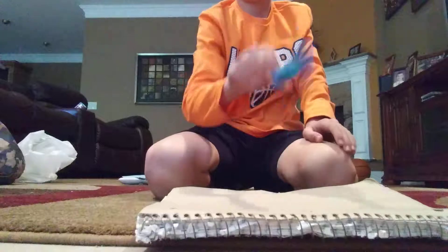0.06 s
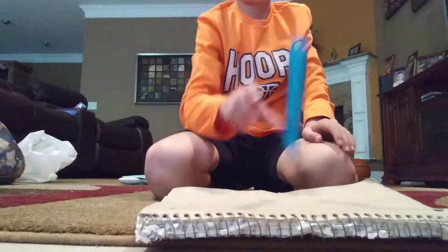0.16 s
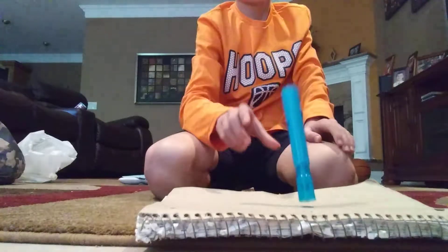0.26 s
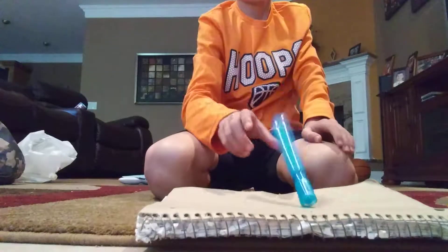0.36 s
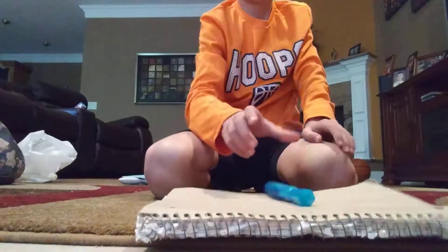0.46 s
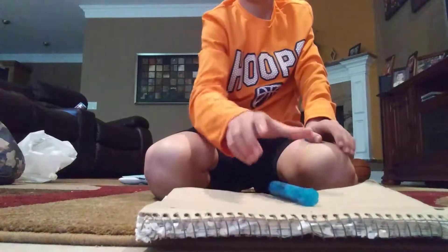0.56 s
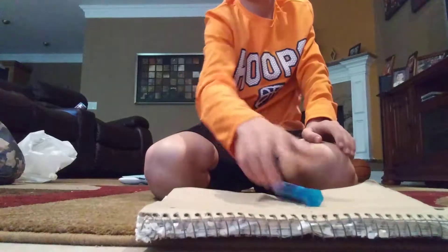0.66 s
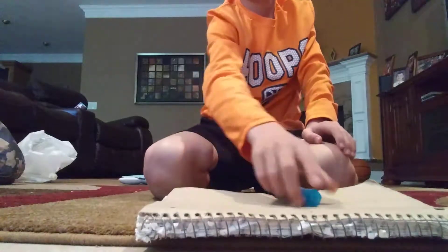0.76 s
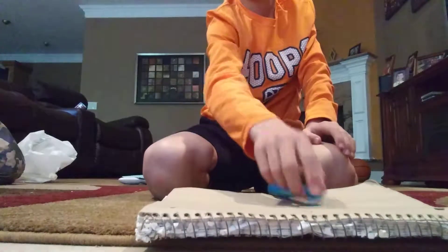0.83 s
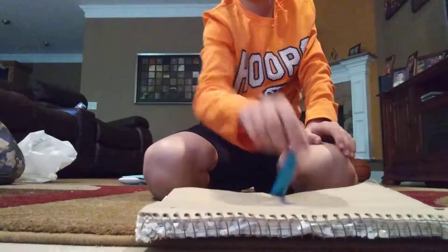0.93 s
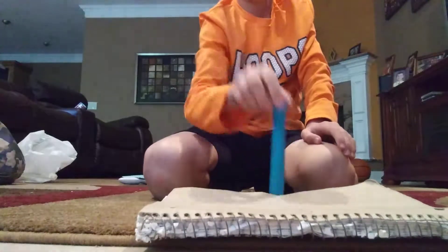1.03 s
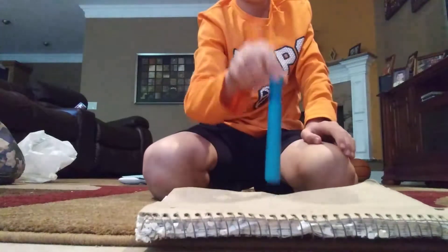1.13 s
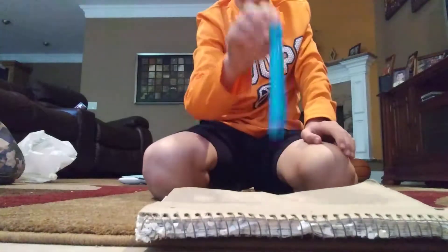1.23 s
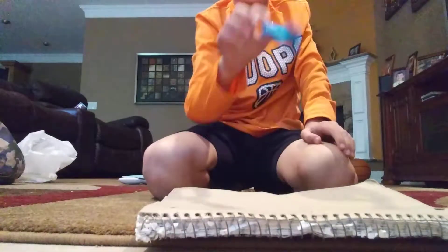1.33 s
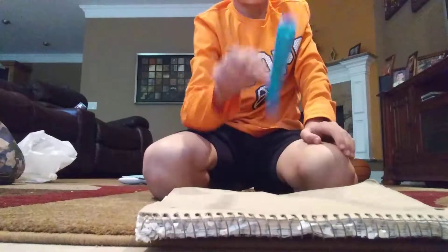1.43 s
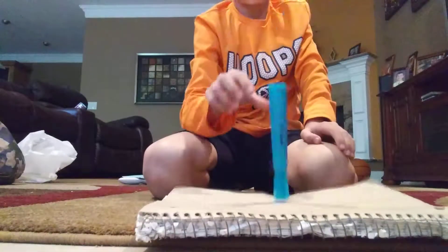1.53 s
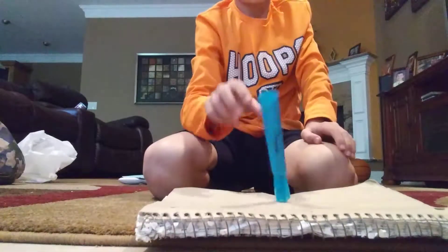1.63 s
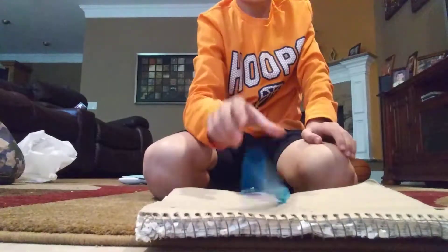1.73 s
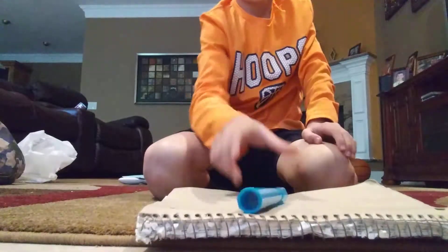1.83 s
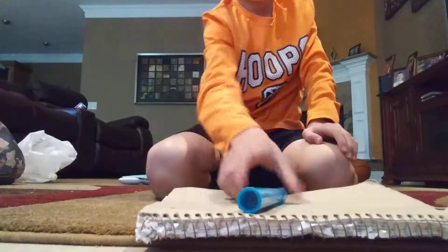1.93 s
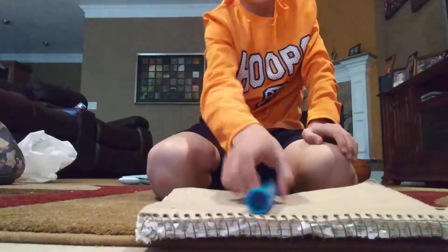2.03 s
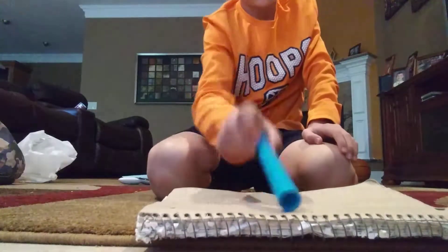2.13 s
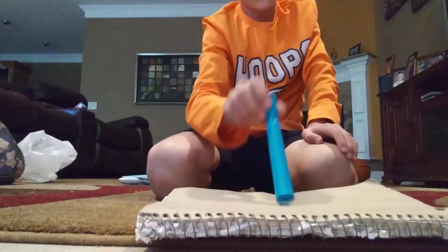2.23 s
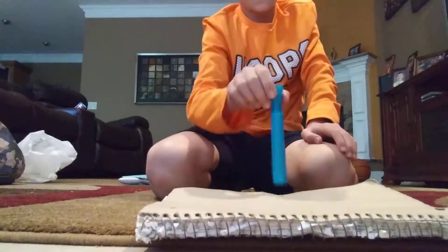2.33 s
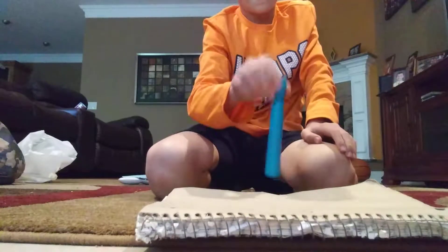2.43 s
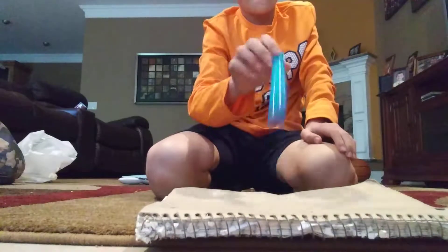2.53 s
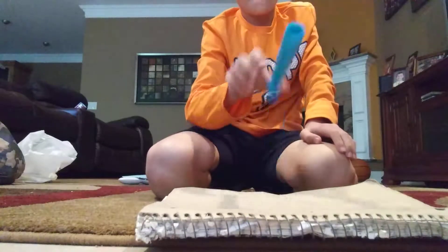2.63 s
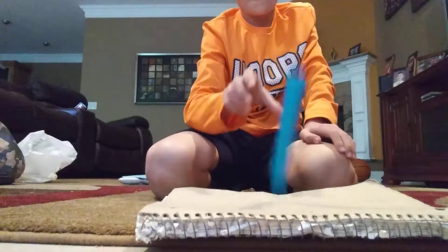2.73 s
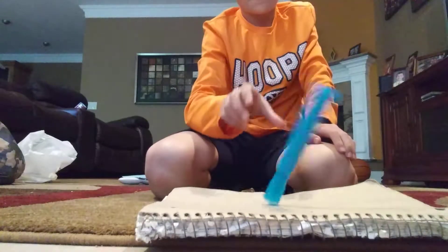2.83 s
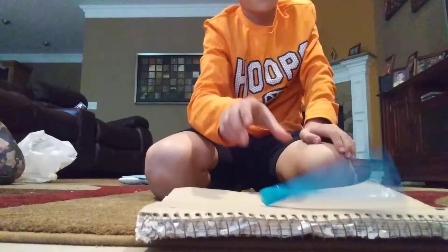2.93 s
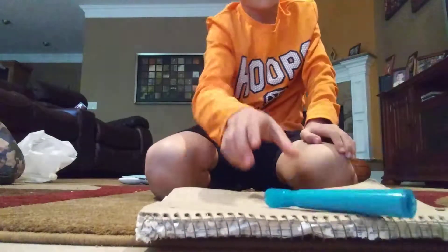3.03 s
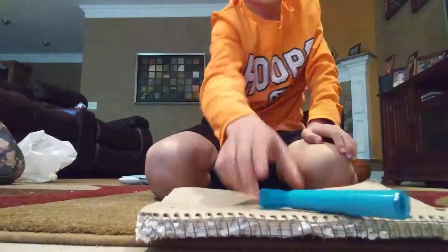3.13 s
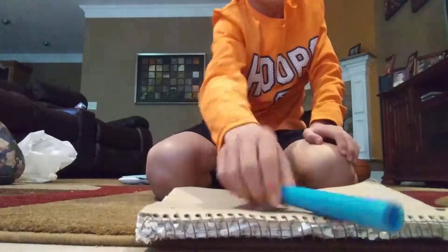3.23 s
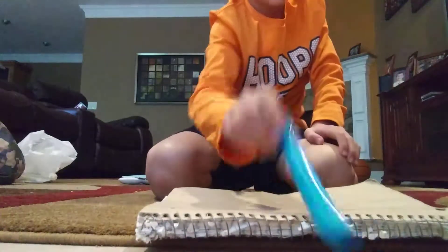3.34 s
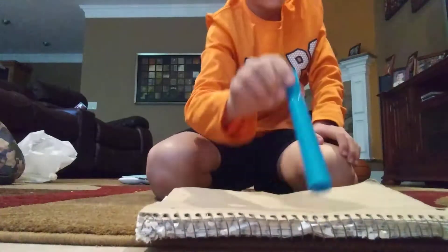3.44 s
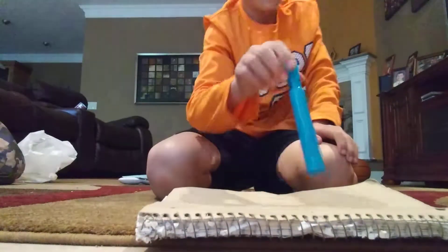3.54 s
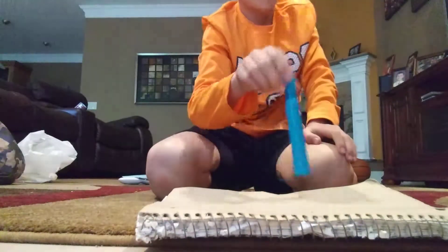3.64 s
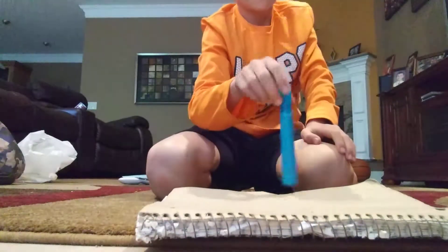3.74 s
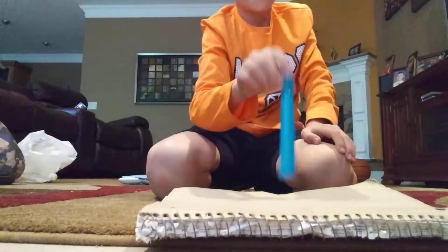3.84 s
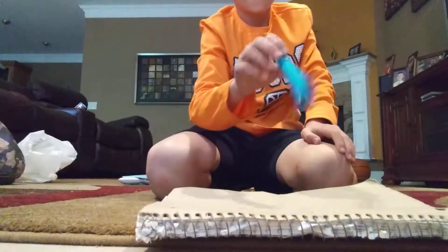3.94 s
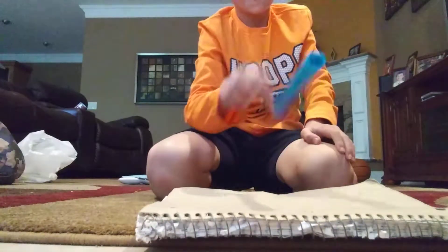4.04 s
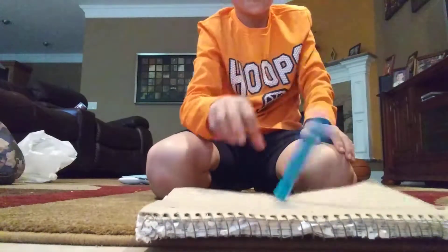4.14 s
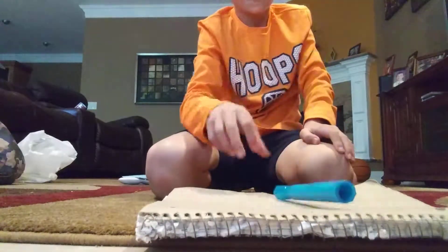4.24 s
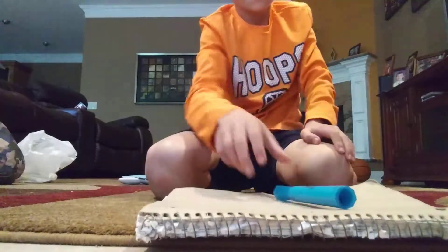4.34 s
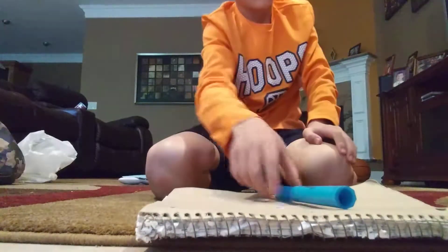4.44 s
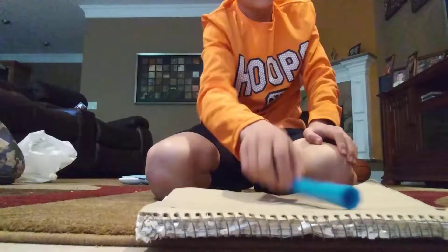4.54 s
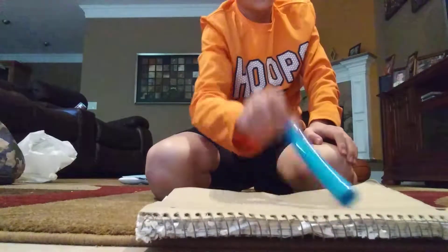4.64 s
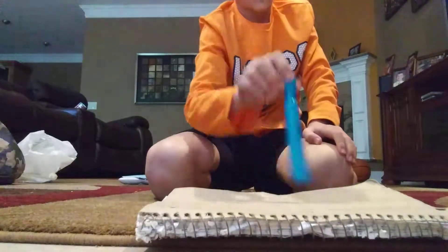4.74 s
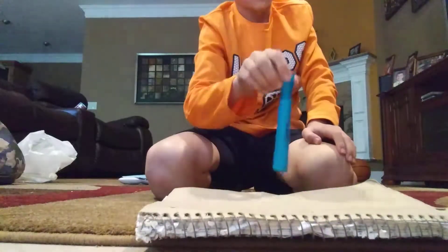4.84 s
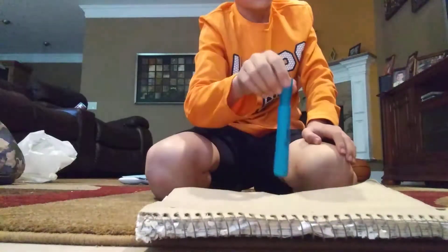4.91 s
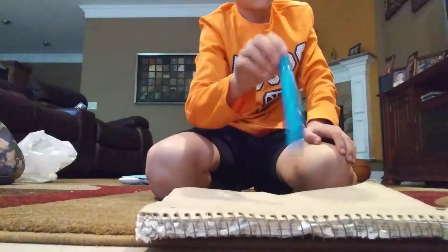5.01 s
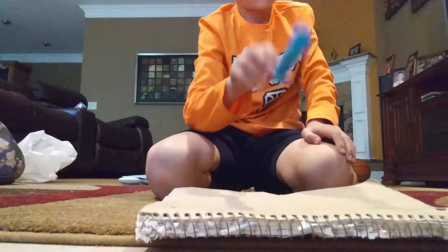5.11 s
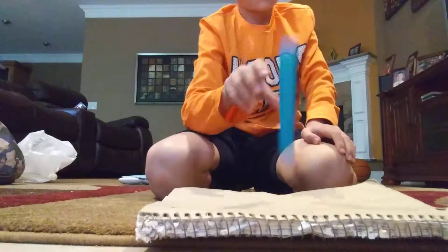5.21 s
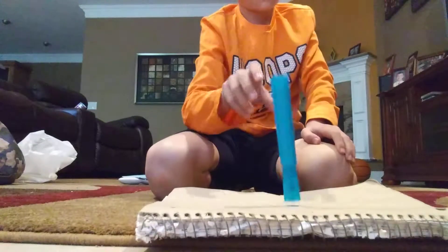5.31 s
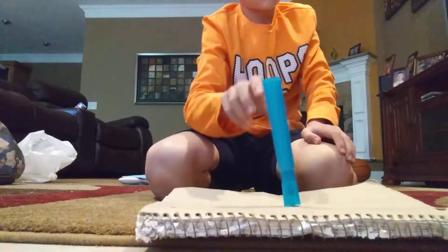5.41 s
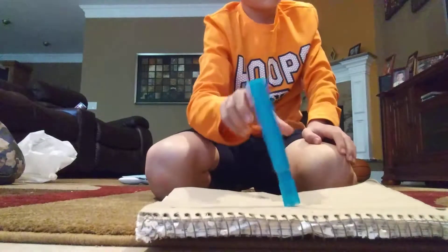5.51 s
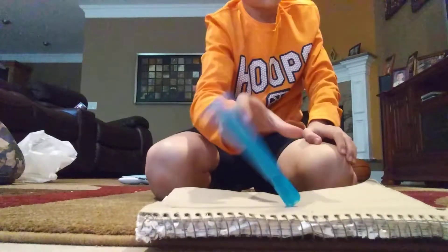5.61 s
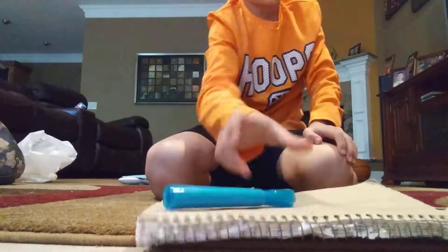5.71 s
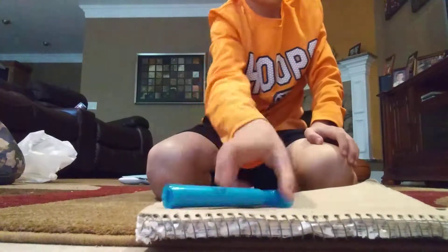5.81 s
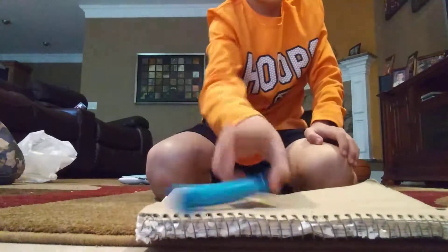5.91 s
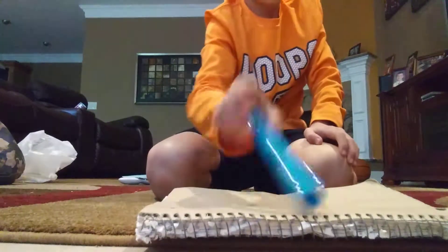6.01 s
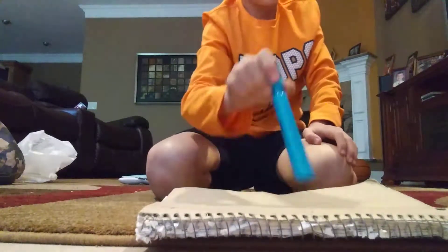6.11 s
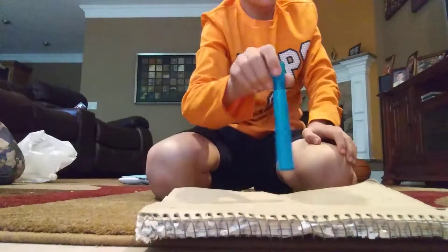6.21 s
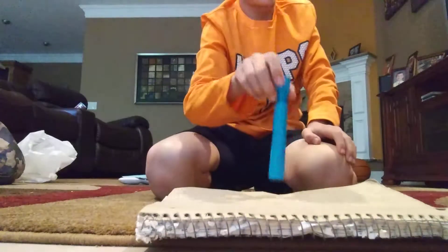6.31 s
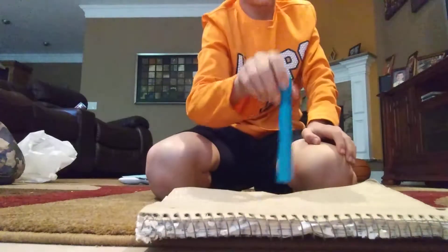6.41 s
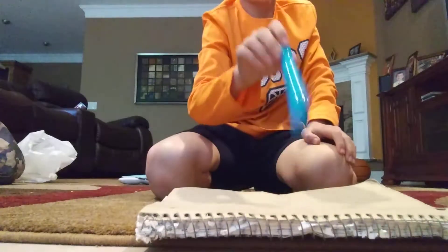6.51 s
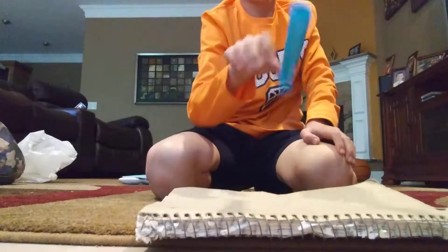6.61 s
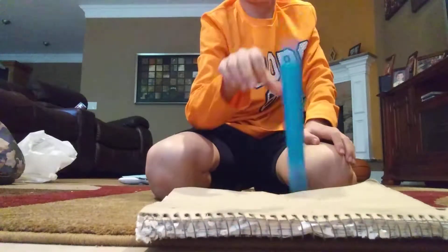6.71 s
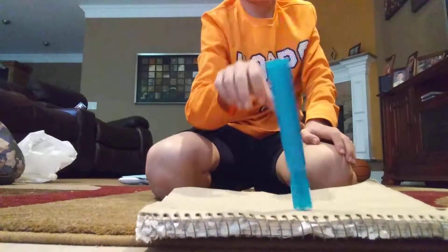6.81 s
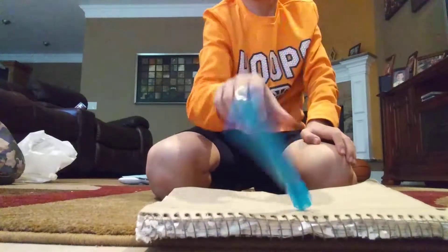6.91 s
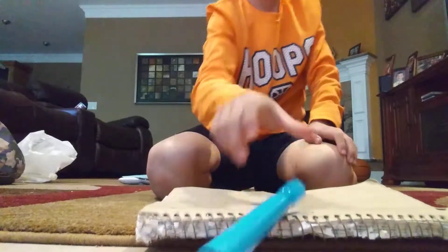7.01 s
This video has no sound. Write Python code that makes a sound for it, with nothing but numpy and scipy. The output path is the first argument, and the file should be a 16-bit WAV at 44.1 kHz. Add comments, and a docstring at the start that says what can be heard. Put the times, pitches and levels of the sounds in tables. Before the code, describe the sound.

In a quiet living room, a plastic highlighter is flipped onto a spiral notebook six times. It lands on its end with a thump and a clack, hops, and topples flat. Between throws a hand scrapes it off the cover, the loose cap rattling. The last throw glances off the wire binding with a sharp, bright crack. A nearby phone microphone picks up short room echoes and a very faint hum.

```python
"""Over a low ventilation hum, a plastic highlighter is flipped onto a spiral notebook on a living-room
floor. It lands on its end, thumping the pad and slapping the cover, hops, and topples flat as the room
rings on. A hand comes down and scrapes it up, its loose cap rattling. Five more throws follow; the last
glances off the binding and clips the wire. All the while, the noise suppressor of a phone close by
turns each frequency down as it fades."""
import sys
import numpy as np
from scipy import signal
from scipy.fft import rfft, irfft, next_fast_len
from scipy.io import wavfile
from scipy.ndimage import uniform_filter1d, minimum_filter1d

SR = 44100
rng = np.random.default_rng(int(sys.argv[2]) if len(sys.argv) > 2 else 0)


def int16_out(signal):
    """Quantize to a 16-bit WAV file."""
    q = np.round(np.clip(np.atleast_2d(signal).T, -1, 1) * 32767)
    wavfile.write(sys.argv[1], SR, q.astype(np.int16))


N = 311346


def amp(db):
    """Decibels as a linear gain."""
    return 10 ** (np.asarray(db) / 20)


def unit(x):
    """x at rms 1."""
    return x / np.sqrt(np.mean(x ** 2) + 1e-20)


def along(points, hz):
    """Read a curve of (f/Hz, value) points on a log frequency axis."""
    f, values = np.transpose(points)
    return np.interp(np.log(hz + 1), np.log(f + 1), values)


def add(track, s, sound):
    """Mix a sound into the track from time s."""
    part = track[max(round(s * SR), 0):][:len(sound)]
    part += sound[:len(part)]


def filtered(x, response):
    """x through an EQ given as a function of frequency."""
    size = next_fast_len(len(x) + SR)
    return irfft(rfft(x, size) * response(np.fft.rfftfreq(size, 1 / SR)), size)[:len(x)]


def coloured(x, spectrum):
    """x with a (f/Hz, level/dB) colour, at rms 1."""
    return unit(filtered(x, lambda hz: amp(along(spectrum, hz))))


def sharpest_pulse(gain):
    """The minimum-phase pulse that has this magnitude spectrum."""
    cepstrum = irfft(np.log(np.maximum(gain, 1e-6)))
    half = len(cepstrum) // 2
    cepstrum[1:half] *= 2
    cepstrum[half + 1:] = 0
    return irfft(np.exp(rfft(cepstrum)))


HUM_COLOUR = [(20, -40.5), (45, -13.5), (75, -13), (103, -1), (125, -2.5), (150, -19), (240, -28),
              (285, -29), (320, -7), (360, -23.5), (600, -34.5), (2000, -71.5)]  # tone of the ventilation: f/Hz, level/dB
HUM_FADER = [(0, -66), (0.921, -65.5), (1.22, -71.5), (1.36, -63.5), (2.699, -65.5), (3.3, -62), (3.7, -68),
             (4.4, -58.5), (4.949, -66), (6.37, -62), (6.7, -69)]  # its slow swell: t/s, level/dB


def ventilation():
    """The bed: a low, wavering ventilation hum."""
    level_db = np.interp(np.arange(N) / SR, *np.transpose(HUM_FADER))
    return amp(level_db) * coloured(rng.standard_normal(N), HUM_COLOUR)


# faint rustles between the hits: t/s, centre f/Hz, width/Hz, level/dB, t60/s
RUSTLES = [(3.5, 1343, 260, -60.5, 0.21), (4.124, 810, 1300, -57, 0.24), (4.124, 2110, 1300, -62, 0.5),
           (5.641, 1300, 600, -56, 0.43), (5.653, 2190, 650, -52, 0.24), (5.643, 5840, 443.5, -68, 0.92)]


def rustles(attack_s=0.0015):
    """Small puffs of band-passed noise that swell quickly and fade."""
    track, t = np.zeros(N), np.arange(SR // 4) / SR
    for s, centre_hz, width_hz, db, t60 in RUSTLES:
        noise = rng.standard_normal(len(t))
        band = unit(filtered(noise, lambda hz: 1 / (1 + (2 * (hz - centre_hz) / width_hz) ** 2) ** 2))
        add(track, s, band * amp(db - 60 * t / t60) * (1 - np.exp(-t / attack_s)))
    return track


# the room's ringing notes: f/Hz, width/Hz, level/dB
ROOM_MODES = [(103.4, 4.9, -6.5), (117.2, 1.9, -4), (180.5, 6, -4), (326, 7.9, -1.5), (436, 8.2, -1),
              (613, 6, -8.5), (1450, 3, -8), (1520, 2.6, -10.5)]


def standing_waves(x):
    """The room's modes boom on after each hit."""
    def response(hz):
        return sum(amp(db) * 1j * hz * width / (centre ** 2 - hz ** 2 + 1j * hz * width)
                   for centre, width, db in ROOM_MODES)
    return filtered(x, response)


REVERB_COLOUR = [(60, -9.5), (180, -6.5), (500, -8.5), (900, -14), (1250, -9), (1480, -8), (1750, -7.5),
                 (2200, -8.5), (3100, -11.5), (4200, -15.5), (5500, -10), (8000, -5.5), (12000, -9.5)]  # tone of the tail off the walls: f/Hz, level/dB
REVERB_DECAY = [(80, 1), (210, 0.31), (560, 0.57), (1250, 0.63), (1480, 1), (1750, 0.64), (3900, 1),
                (5200, 1), (6500, 0.67), (9000, 0.17)]  # length of the tail: f/Hz, t60/s


def reverb(sounds, build_s=0.0013, size=256):
    """Every sound leaves its own diffuse tail, each frequency dying at its own speed."""
    wet, tail_samples = np.zeros(N), SR * 3 // 4
    hz, t, _ = signal.stft(np.zeros(tail_samples), SR, nperseg=size)
    fade = amp(-60 * t / along(REVERB_DECAY, hz)[:, None]) * (1 - np.exp(-t / build_s))
    band_energy = np.mean(fade ** 2, axis=1, keepdims=True) * t[-1] * SR
    fade *= amp(along(REVERB_COLOUR, hz))[:, None] / np.sqrt(band_energy)
    for s, sound in sounds:
        noise = signal.stft(rng.standard_normal(tail_samples), SR, nperseg=size)[2]
        tail = signal.istft(noise * fade, SR, nperseg=size)[1]
        add(wet, s, signal.fftconvolve(sound, tail))
    return wet


# early echoes: delay/s, level/dB
CEILING_ECHOES = [(0.0156, -18), (0.0323, -24)]


def slapback(x):
    """The sound bounces between ceiling and floor."""
    echoes = np.zeros(N)
    for delay, db in CEILING_ECHOES:
        add(echoes, delay, amp(db) * x)
    return echoes


PAPER_COLOUR = [(100, -8.5), (400, -3), (900, 0), (1500, -8.5), (2300, -13), (3200, -10.5), (6000, -13),
                (9000, -49)]  # dull brush of paper: f/Hz, level/dB
PLASTIC_COLOUR = [(500, -26), (3200, -21.5), (4400, 16.5), (5400, -4), (6500, -52), (10000, -44)]  # thin scrape of plastic: f/Hz, level/dB
# fingers and pen slide on the cover: t/s, length/s, paper level/dB, plastic level/dB
SLIDES = [(0.797, 0.051, -58.5, -67.5), (1.938, 0.048, -48, -78), (2.107, 0.04, -64, -50.5),
          (2.145, 0.023, -67.5, -48.5), (3.232, 0.053, -46.5, -53.5), (4.582, 0.042, -53, -55)]


def slides(grain_db=5):
    """Sliding contact catches on the paper's fibres in tiny uneven slips; yields (t/s, sound)."""
    for s, length, paper_db, plastic_db in SLIDES:
        for colour, db in ((PAPER_COLOUR, paper_db), (PLASTIC_COLOUR, plastic_db)):
            noise, slip_sizes = rng.standard_normal((2, SR // 8))
            grain = amp(grain_db * unit(uniform_filter1d(slip_sizes, size=40)))
            slips = coloured(noise * grain, colour)[:int(length * SR)]
            yield s, amp(db) * slips * signal.windows.tukey(len(slips), .5)


# the pen clips the wire spiral: t/s, level/dB
WIRE_HITS = [(3.0088, -17.5), (3.0089, -17), (7.0216, -11)]


def wire(t60=0.018):
    """The struck spiral answers with a brief, very bright splash; yields (t/s, sound)."""
    t = np.arange(SR // 25) / SR
    for s, db in WIRE_HITS:
        noise = rng.standard_normal(len(t))
        sizzle = filtered(noise, lambda hz: amp(along([(7000, -22.5), (12000, -5)], hz)))
        splash = sizzle * amp(-60 * t / t60)
        yield s, amp(db) * splash / np.linalg.norm(splash)


def chatter(pulse, db, t60, low_cut_hz=700, attack_s=0.00019):
    """The hit plus a short buzz of pages, wire and the pen's insides, above the pad's thump."""
    t = np.arange(SR // 25) / SR
    buzz = rng.standard_normal(len(t)) * amp(-60 * t / t60) * (1 - np.exp(-t / attack_s))
    buzz *= amp(db) / np.linalg.norm(buzz)
    buzz = signal.lfilter(*signal.butter(1, low_cut_hz, "high", fs=SR), buzz)
    buzz[0] = 1  # lets the dry hit through
    return signal.fftconvolve(pulse, buzz)


def resonances(modes, hz, vary_db, skirt, pitch=1):
    """Power spectrum of damped modes, each excited at a new strength."""
    power = 0
    for centre, width, db in modes:
        detune = (hz ** 2 - (centre * pitch) ** 2) / (hz * width + 1)
        peak = amp(db + vary_db * rng.standard_normal()) ** 2
        power = power + peak / (1 + detune ** 2 / skirt) ** skirt
    return power


# modes around a pitch set by the spot that is struck: ratio to that pitch, width/Hz, level/dB
PAD_THUMP = [(.64, 53.85, -4), (1.05, 78.45, -2), (1.75, 92.1, -10)]
COVER_SLAP = [(.74, 177.5, -0.87), (.97, 200, -0.2), (1.3, 260, -1.7)]
CAP_RING = [(.83, 262, -2), (.92, 219, -1.5), (1, 237, 1.5), (1.09, 270, -1.5), (1.18, 323.1, -2.5),
            (1.42, 1807, -11)]
# modes of the pen's barrel and of the floorboard under the notebook: f/Hz, width/Hz, level/dB
BARREL_KNOCK = [(1290, 400, -4), (1500, 140, -2), (2070, 610, -2.5), (3110, 970, -2)]
FLOOR_BOOM = [(81, 42, -9.5)]


def contact(mix, db, thump_db=0, slap_db=0, knock_db=0, pad_hz=170, cover_hz=760, cap_hz=4700):
    """One contact thumps the pad and floor, slaps the cover and rings the pen's barrel and cap."""
    hz = np.fft.rfftfreq(4096, 1 / SR)
    pad_db, cover_db, barrel_db, overtone_db, cap_db, treble_db = mix
    pad = resonances(PAD_THUMP, hz, pitch=pad_hz, vary_db=3.5, skirt=1.32)
    floor = resonances(FLOOR_BOOM, hz, vary_db=0.5, skirt=0.64)
    cover = resonances(COVER_SLAP, hz, pitch=cover_hz, vary_db=4.5, skirt=1.3)
    barrel = resonances(BARREL_KNOCK, hz, vary_db=2, skirt=1.4)
    barrel *= amp(overtone_db * along([(2400, 0), (2900, 1)], hz)) ** 2
    cap = resonances(CAP_RING, hz, pitch=cap_hz, vary_db=2.5, skirt=1.25)
    layers = ((pad_db + thump_db, pad + floor), (cover_db + slap_db, cover),
              (barrel_db + knock_db, barrel), (cap_db, cap))
    power = sum(amp(layer_db) ** 2 * layer for layer_db, layer in layers)
    # a harder contact is shorter, so its top end rolls off more gently
    corner_hz, crack_hz, treble_per_db = 5800, 8500, .55
    slope = np.log(np.maximum(hz / corner_hz, 1)) / np.log(crack_hz / corner_hz)
    rolloff_db = min(treble_db + treble_per_db * db, -3) * slope
    return sharpest_pulse(np.sqrt(power) * amp(db + rolloff_db))


def ticking(pulse, length, gap_s=0.0018, scatter_db=0, count=24):
    """The pulse's energy spread over a quick, unevenly timed run of ticks, gap_s apart on average."""
    gaps = gap_s * (.5 + rng.random(count))
    times = np.cumsum(gaps) - gaps[0]
    fade_out = np.clip((length - times) / gap_s + .5, 0, 1)
    sizes = amp(scatter_db * rng.standard_normal(count)) * fade_out
    ticks = np.bincount((times * SR).astype(int), sizes / np.linalg.norm(sizes))
    return signal.fftconvolve(pulse, ticks)


# layer mix of each handling sound: pad/dB, cover/dB, barrel/dB, barrel overtone/dB, cap/dB, treble/dB
PRESS_MIX = (2, -2, -12, -29, -14.5, -4)
DRAG_MIX = (-7, 1, -0.5, -1, 0, -14.5)
RATTLE_MIX = (-16.5, -22.5, -15.5, -0.5, -2, -9.5)
# hand and pen press softly on the notebook: t/s, level/dB, thump trim/dB, cover f/Hz
PRESSES = [(0.789, -13, -10, 505), (0.8568, -11.5, -5, 994), (1.951, -10.5, 6, 507), (1.9582, -5, 5.5, 596),
           (1.9927, -11, 7.5, 640), (3.233, -2.5, -20, 940), (3.2379, -12, 12.5, 750),
           (4.8294, -9, -20, 697), (5.002, -47.5, 40.5, 489), (5.4017, -17, 17.5, 815)]
# the dragged pen judders over the cover: t/s, length/s, level/dB, knock and slap trim/dB
JUDDERS = [(2.151, 0.011, -16, -5), (2.18, 0.0055, -11.5, 0), (2.19, 0.0084, -11.5, 3),
           (2.2253, 0.0013, -12, 1.5), (2.235, 0.0035, -12, -5.5), (2.2421, .006, -4, -1.5),
           (2.271, 0.0063, -5, -9.5)]
# the loose cap rattles: t/s, length/s, level/dB, cap f/Hz
CAP_RATTLES = [(0.789, .003, -28, 4790), (0.816, .018, -18, 4270), (0.858, .001, -25, 4280),
               (1.087, .004, -22, 4900), (2.117, .014, -12, 4700), (3.2842, .001, -9.5, 4750),
               (3.332, 0.0014, -11.5, 4550), (3.3472, 0.0012, -14, 4800), (3.3919, 0.0023, 0, 4710),
               (5.9717, 0.0045, -0.5, 5360), (6.009, 0.0064, 6.5, 5200), (6.0198, .003, 5, 5400),
               (6.026, 0.0027, 1, 4220)]


def pickups():
    """The hand comes down, drags the pen and lifts it, its cap rattling; yields (t/s, sound)."""
    for s, db, thump_db, cover_hz in PRESSES:
        yield s, contact(PRESS_MIX, db, thump_db, cover_hz=cover_hz)
    for s, length, db, body_db in JUDDERS:
        # the cap rings lower while it lies on the cover
        catch = contact(DRAG_MIX, db, slap_db=body_db, knock_db=body_db, cap_hz=4200)
        yield s, ticking(catch, length)
    for s, length, db, cap_hz in CAP_RATTLES:
        yield s, ticking(contact(RATTLE_MIX, db, cap_hz=cap_hz), length)


# layer mix of each impact: pad/dB, cover/dB, barrel/dB, barrel overtone/dB, cap/dB, treble/dB
LANDING_MIX = (19.5, 1, 0.5, -5.5, 1.5, -19.5)
BOUNCE_MIX = (15, 11.5, 6.5, -7, 2.5, -16.5)
TOPPLE_MIX = (3.5, 1.5, -2.5, -2.5, 1.5, -13.5)
EDGE_MIX = (-20.5, -6.5, -11.5, 1, -1, -14)
# the pen lands on its end: t/s, level/dB, thump trim/dB, slap trim/dB, pad f/Hz, cover f/Hz, cap f/Hz
LANDINGS = [(0.2782, 6.5, -2.5, -2.5, 176, 887, 5130), (1.5769, 10.5, -6.5, -3, 180.3, 816, 4730),
            (2.8118, 4.5, 2.5, 7, 175.5, 656, 4685), (4.185, 8.5, -9, 6, 293.9, 650, 4910),
            (5.2909, -2, 10, -10, 196.7, 490, 4815), (6.77, 11, -7, 0.5, 200, 596, 4730)]
# it hops and comes down again: t/s, level/dB, thump trim/dB, cap f/Hz
BOUNCES = [(0.3493, -10.5, 3, 5530), (1.6476, -10.5, -12, 4870), (1.839, -18.5, 6, 4460),
           (2.8932, -13.5, 5.5, 4730), (4.3251, -4.5, -7, 4120), (4.5, -14, -3.5, 4600),
           (5.367, -13, 7, 4420), (6.8235, -16.5, -41, 4800)]
# it topples flat, one end just before the other: t/s, level/dB, thump trim/dB, slap trim/dB,
# pad f/Hz, cover f/Hz, cap f/Hz, far end lag/s, far end trim/dB
TOPPLES = [(0.4982, -6.5, 15, -2.5, 170, 790, 4700, .0026, 2.5),
           (1.8058, 14, -3.5, -5.5, 126, 713, 4430, .0018, -7),
           (3.007, 11.5, 2.5, -3, 171.6, 605, 5200, .0025, -3),
           (4.2579, 11.5, -0.5, 4, 187, 650, 4237, 0.0018, -16.5),
           (5.7269, 7, 2, -4, 141.2, 720, 4840, .0017, 4.5)]
# the last throw skids off the bound edge: t/s, length/s, level/dB, cap f/Hz, knock and slap trim/dB
EDGE_HITS = [(7.006, .0003, 18, 5330, -10.5), (7.0191, 0.00062, 6, 5175, 4), (7.02, 0.002, 23, 4457, -2)]


def throws():
    """The pen lands end-on, hops, and topples flat or glances off the edge; yields (t/s, sound)."""
    for s, db, thump_db, slap_db, pad_hz, cover_hz, cap_hz in LANDINGS:
        spot = dict(pad_hz=pad_hz, cover_hz=cover_hz, cap_hz=cap_hz)
        yield s, contact(LANDING_MIX, db, thump_db, slap_db, **spot)
    for s, db, thump_db, cap_hz in BOUNCES:
        yield s, contact(BOUNCE_MIX, db, thump_db, pad_hz=160, cover_hz=714, cap_hz=cap_hz)
    for s, db, thump_db, slap_db, pad_hz, cover_hz, cap_hz, lag_s, far_db in TOPPLES:
        spot = dict(pad_hz=pad_hz, cover_hz=cover_hz, cap_hz=cap_hz)
        yield s, contact(TOPPLE_MIX, db, thump_db, slap_db, **spot)
        # less thump from the far end: it finds the pad already pressed down
        yield s + lag_s, contact(TOPPLE_MIX, db + far_db, thump_db - 9.5, slap_db, **spot)
    for s, length, db, cap_hz, body_db in EDGE_HITS:
        # the cover is stiff near the binding, so it slaps higher
        glance = contact(EDGE_MIX, db, slap_db=body_db, knock_db=body_db, cover_hz=1100, cap_hz=cap_hz)
        yield s, ticking(glance, length, gap_s=.0007)


def scene():
    """The mono mix: the pen up close, the room's answer, faint rustles and the hum."""
    hits = [*throws(), *pickups()]
    textures = [*slides(), *wire()]
    pen = np.zeros(N)
    for s, hit in hits:
        add(pen, s, chatter(hit, db=-7.5, t60=0.041))
    for s, texture in textures:
        add(pen, s, texture)
    room = slapback(pen) + reverb(hits + textures) + standing_waves(pen)
    return (pen + room + rustles() + ventilation())[None]


# where the noise suppressor closes: f/Hz, level/dB
GATE_THRESHOLD = [(60, -49.5), (300, -41), (700, -49), (1500, -53), (3000, -54), (5000, -52.5), (8000, -58),
                  (14000, -58)]


def noise_suppressor(x, smooth_s=0.018, depth_db=-17, knee_db=.9, size=512):
    """A spectral gate: each band is turned down once its smoothed level sinks under the threshold."""
    hop = size // 4
    hz, _, bands = signal.stft(x, SR, nperseg=size, noverlap=size - hop)
    power = uniform_filter1d(abs(bands) ** 2 * size, size=4, axis=0)
    memory = np.exp(-hop / SR / smooth_s)
    envelope = signal.lfilter([1 - memory], [1, -memory], power)
    over_db = 10 * np.log10(abs(envelope) + 1e-20) - along(GATE_THRESHOLD, hz)[:, None]
    shut = .5 - .5 * np.tanh(over_db / (2 * knee_db))
    return signal.istft(bands * amp(depth_db * shut), SR, nperseg=size, noverlap=size - hop)[1][:N]


def limiter(x, ceiling=.9, size=129):
    """The gain dips smoothly around any peak that would overload."""
    gain = ceiling / np.maximum(abs(x), ceiling)
    return x * uniform_filter1d(minimum_filter1d(gain, size), size)


MIC_EQ = [(20, -21.5), (45, -5.5), (70, 2), (8300, -2), (9800, -5), (10800, -16), (15500, -10)]  # tone of the phone's microphone: f/Hz, level/dB
HISS_COLOUR = [(30, 6.5), (400, 10), (1000, 5.5), (2500, 2), (8000, -0.5), (15000, -0.5)]  # tone of its noise floor: f/Hz, level/dB


def record(dry, high_cut_hz=15750):
    """The phone colours the sound, adds its hiss, gates, limits and cuts the top."""
    microphone = sharpest_pulse(amp(along(MIC_EQ, np.fft.rfftfreq(8192, 1 / SR))))
    hiss = amp(-62.5) * coloured(rng.standard_normal(N), HISS_COLOUR)
    gated = noise_suppressor(signal.fftconvolve(dry[0], microphone)[:N] + hiss)
    return filtered(limiter(gated), lambda hz: hz < high_cut_hz)[None]


dry = scene()
out = record(dry)
int16_out(out)
```